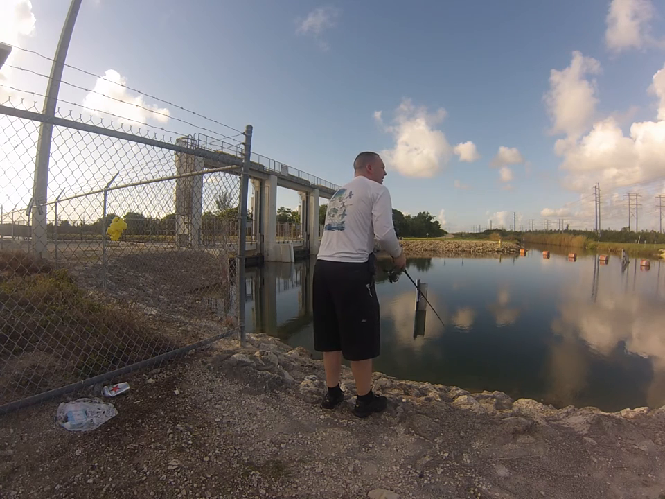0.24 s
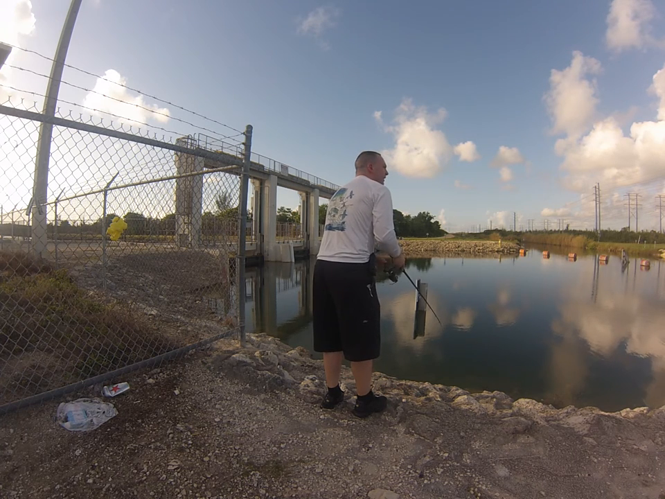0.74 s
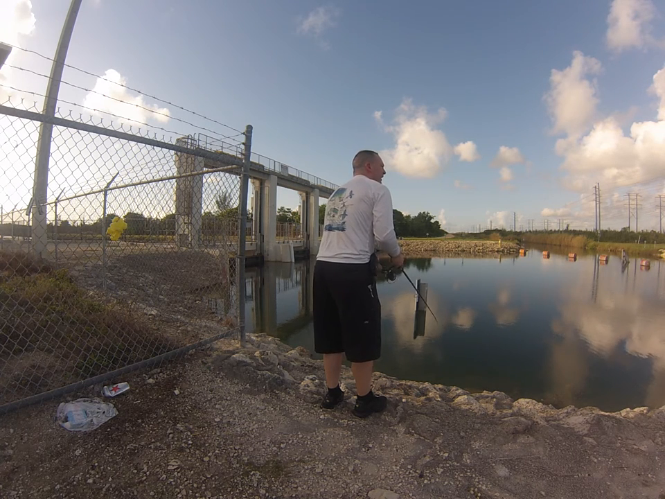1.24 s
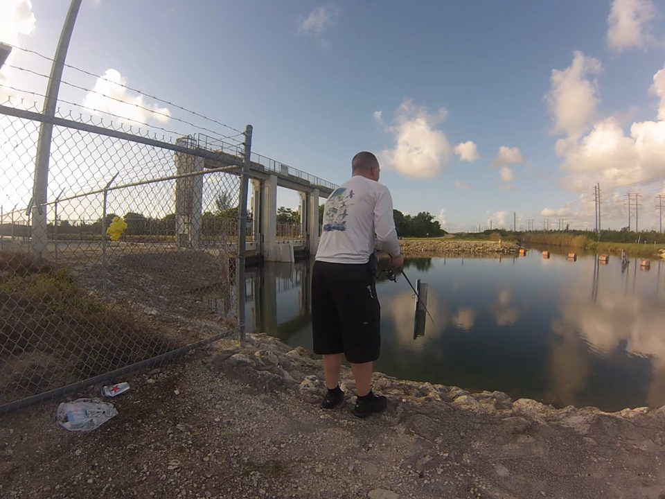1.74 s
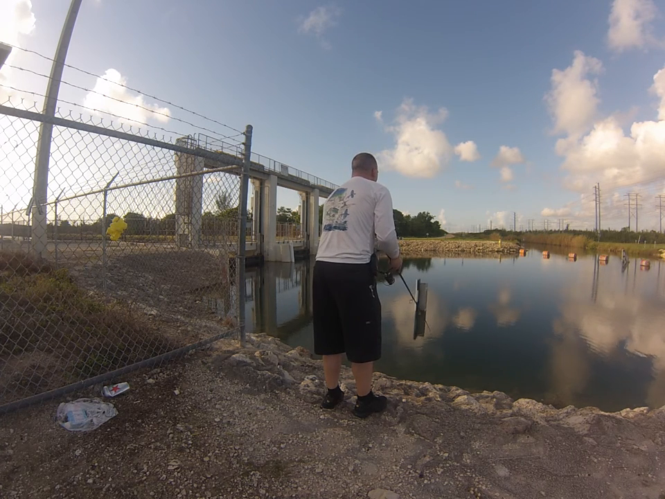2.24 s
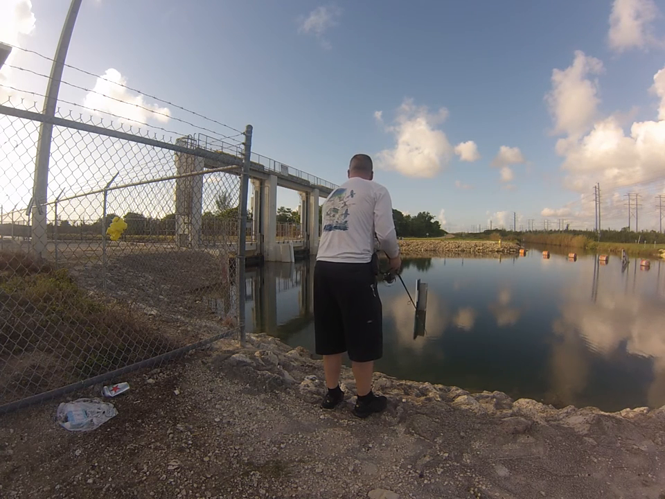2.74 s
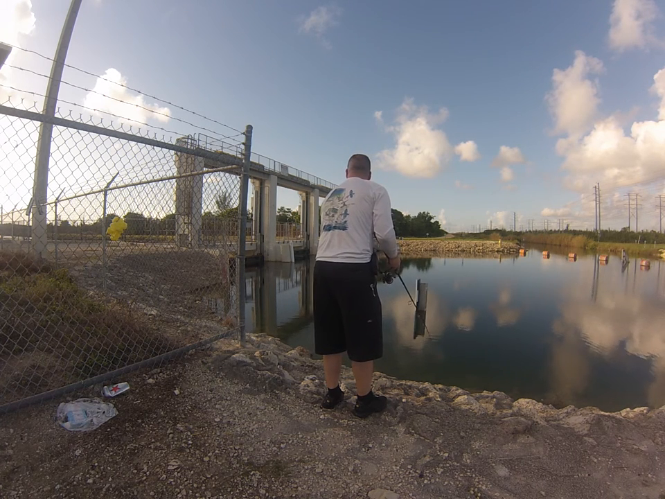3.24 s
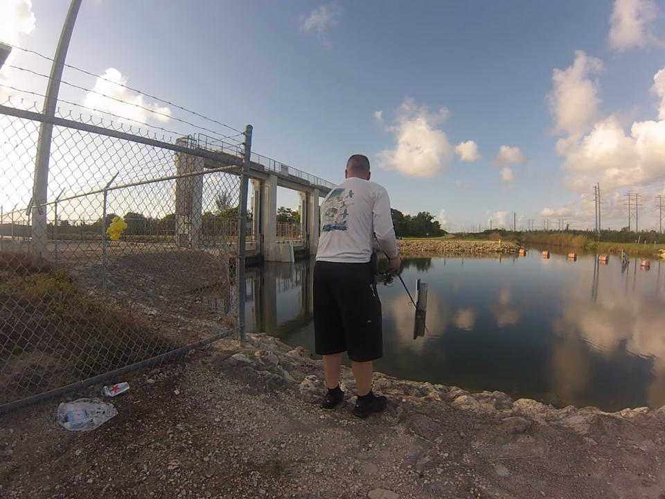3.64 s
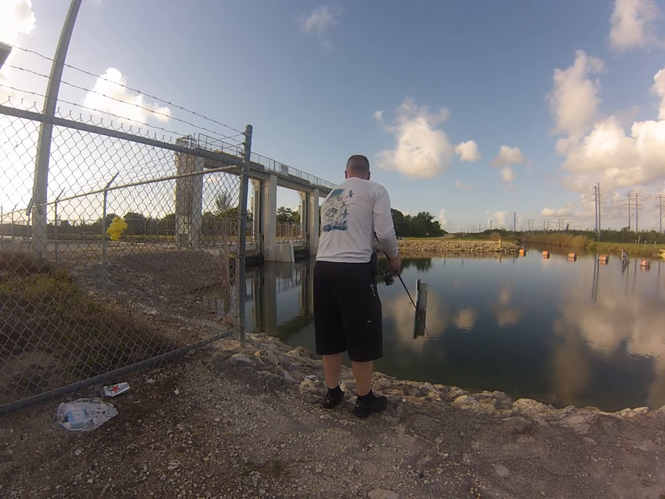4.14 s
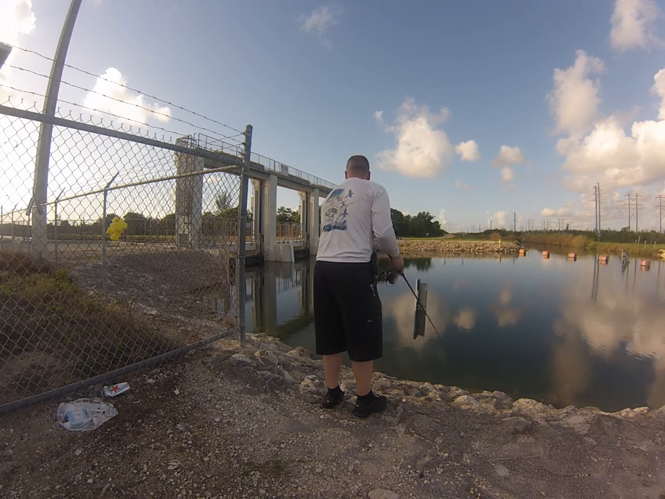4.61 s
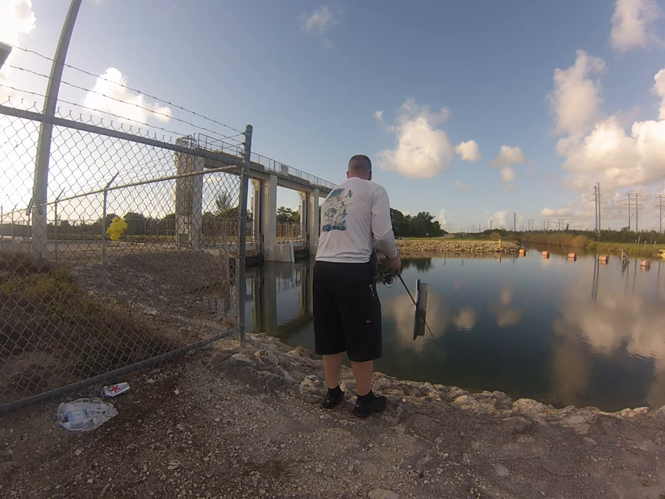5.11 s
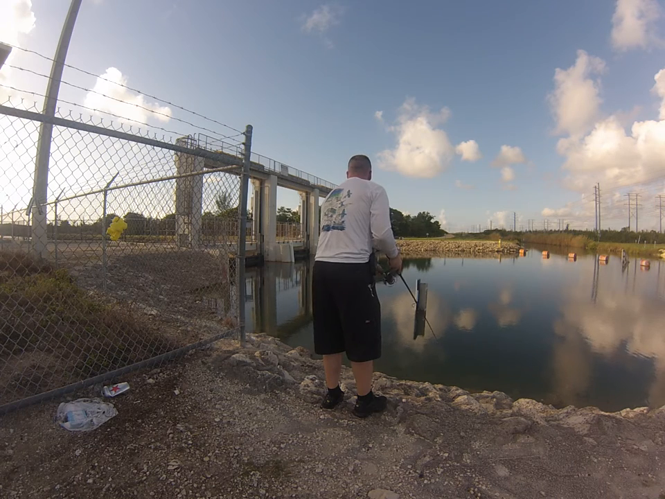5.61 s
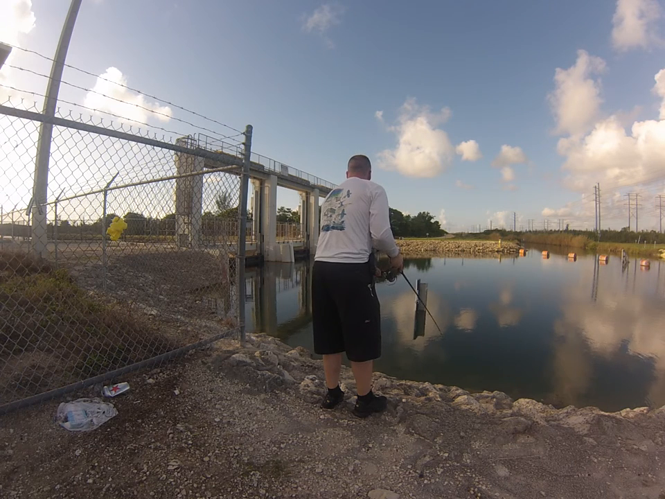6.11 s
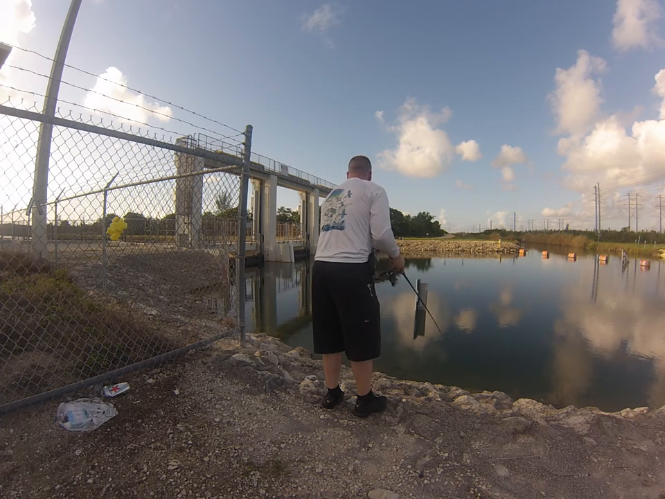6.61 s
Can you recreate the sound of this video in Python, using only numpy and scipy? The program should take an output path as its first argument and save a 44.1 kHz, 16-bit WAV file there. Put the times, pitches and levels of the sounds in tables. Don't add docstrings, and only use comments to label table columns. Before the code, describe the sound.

Outdoors by a canal, an electric pump motor hums steadily with many fixed tones, beating slowly against mains hum. Low drones of farther machines and a breeze rumble lie underneath. Wind bumps the microphone in the first seconds, strongest as a soft thump just after one second. A few tiny reel ticks, far insects, hiss and dry crackles sit faintly on top.

```python
import sys
import numpy as np
from scipy import signal
from scipy.fft import rfft, irfft
from scipy.io import wavfile
from scipy.ndimage import uniform_filter1d, map_coordinates

SR = 44100
rng = np.random.default_rng(int(sys.argv[2]) if len(sys.argv) > 2 else 0)


def how_loud(loudness_db):
    steps = np.asarray(loudness_db, float) / 20
    return 10 ** steps


def output_pcm(signal):
    pcm = np.clip(np.atleast_2d(signal).T, -1, 1) * 32767
    wavfile.write(sys.argv[1], SR, np.round(pcm).astype(np.int16))


N = 302526
TIME = np.arange(N) / SR

SHAFT_HZ, MAINS_HZ, STROKES = 29.7613, 59.994, 12
SLIP_HZ = 2 * MAINS_HZ - 4 * SHAFT_HZ


def unit(x):
    return x / np.sqrt(np.mean(x ** 2) + 1e-20)


def wobble(rate_hz):
    knots = rng.standard_normal(int(N * rate_hz / SR) + 4)
    return map_coordinates(knots, [TIME * rate_hz])


def noise(spectrum, patchy_db):
    z = signal.stft(rng.standard_normal(N + 512), nperseg=512)[2]
    field = uniform_filter1d(rng.standard_normal(z.shape), size=6, axis=0)
    field = uniform_filter1d(field, size=8, axis=1)
    patchy = signal.istft(z * how_loud(patchy_db * unit(field)), nperseg=512)[1][:N]
    f, db = np.transpose(spectrum)
    hz = np.fft.rfftfreq(N, 1 / SR)
    colour_db = np.interp(np.log(hz + 1), np.log(f), db, left=-120, right=-120)
    return unit(irfft(rfft(patchy) * how_loud(colour_db), N))


# multiple of shaft speed, level in dB rms.
STROKE_TONES = [(12, -57.6), (24, -75.3), (36, -67.7), (48, -61.7), (60, -58.1), (72, -62.3), (84, -69.0),
                (96, -96.6), (108, -88.5)]
# multiple of shaft speed, level in dB rms.
THIRDS = [(3, -58.1), (9, -71.4), (15, -66.6), (18, -74.9), (27, -68.1), (30, -78.2), (33, -78.2),
          (57, -78.7), (63, -74.7), (69, -79.7), (87, -80.8)]
# multiple of shaft speed, level in dB rms.
UNBALANCE = [(5, -72.5), (10, -74.6), (11, -78.2), (14, -76.7), (16, -67.1), (17, -75.8), (47, -80.8),
             (49, -74.1), (53, -80.0), (59, -76.1), (67, -79.7), (70, -77.8), (71, -73.5), (73, -76.8)]
# multiples away from it, level under it in dB.
ROCKING = [(-2, -24), (-1, -17), (1, -23), (2, -22), (-4, -27), (4, -28)]
HIGH_STROKES_DB, HIGH_LOSS_DB, HIGH_SCATTER_DB = -93.5, .6, 2
OTHER_THIRDS_DB, THIRDS_SCATTER_DB = -83.5, 2


def shaft_tones():
    scatter = rng.standard_normal(300).clip(-2, 2)
    tones = {}
    for k, db in STROKE_TONES:
        for away, under_db in ROCKING:
            tones[k + away] = db + under_db + 2 * scatter[k + away]
    for k in range(21, 90, 3):
        tones[k] = OTHER_THIRDS_DB + THIRDS_SCATTER_DB * scatter[k]
    for stroke in range(10, 22):
        level_db = HIGH_STROKES_DB - HIGH_LOSS_DB * (stroke - 10)
        tones[stroke * STROKES] = level_db + HIGH_SCATTER_DB * scatter[stroke]
    tones.update([*STROKE_TONES, *THIRDS, *UNBALANCE])
    return [(k, db) for k, db in sorted(tones.items()) if db > -102 + 11 * (k % STROKES > 0)]


# multiple of shaft speed, slip steps away from it, level in dB rms.
MAGNETIC = [(12, 3, -61.6), (8, 2, -70.4), (3, -3, -72.7), (16, 1, -75.0), (16, -1, -79.9), (17, 4, -78.0),
            (8, -1, -78.2), (18, 3, -78.2), (14, -1, -79.7), (27, -1, -82.2), (16, 3, -82.9)]
# multiple, slip steps away from it, level in dB rms.
AGAINST = [(17, -1, -77.1), (11, -1, -77.4), (16, 4, -77.9), (9, 2, -78.4), (10, -2, -79.4), (9, -3, -81.6),
           (17, 1, -82.6), (24, 6, -82.7), (24, 3, -83.0), (27, 2, -83.8)]
IN_STEP_S = .061
CASING_LOW_HZ, CASING_HIGH_HZ, LAG_CYCLES = 900, 2000, .3
ROCK_CYCLES = .17


def motor():
    clock = TIME + 1.2e-5 * wobble(1.1) + 4e-6 * wobble(9.9)
    start = rng.uniform(0, 2 * np.pi, size=300)
    stroke_hz = np.arange(0, 300, STROKES) * SHAFT_HZ
    in_casing = (stroke_hz > CASING_LOW_HZ) & (stroke_hz < CASING_HIGH_HZ)
    start[::STROKES] = np.where(in_casing, 0, -2 * np.pi * LAG_CYCLES)
    k = np.arange(STROKES, 280, STROKES)
    for away in (-3, -1, 1, 3):
        start[k + away] = start[k] + 2 * np.pi * ROCK_CYCLES + away * start[k + 5]
    drift = how_loud(.4 * np.array([wobble(4) for _ in range(7)]))
    out = np.zeros(N)
    for k, db in shaft_tones():
        out += how_loud(db) * drift[k % 7] * np.sin(2 * np.pi * k * SHAFT_HZ * clock + start[k])
    for side, table in ((0.99, MAGNETIC), (-0.97, AGAINST)):
        for k, step, db in table:
            turns = k * SHAFT_HZ * clock + step * SLIP_HZ * (TIME - IN_STEP_S)
            out += side * how_loud(db) * np.sin(2 * np.pi * turns + start[k])
    return np.sqrt(2) * out


# frequency in Hz, level in dB.
FAINT = [(320, -84.5), (500, -100), (900, -91), (1400, -99.5), (2200, -94.5), (3000, -104), (4800, -106)]


def side_tones():
    k, step = np.meshgrid(np.arange(11, 160), np.arange(-3, 9))
    hz = (k * SHAFT_HZ + step * SLIP_HZ).ravel()
    f, level_db = np.transpose(FAINT)
    db = np.interp(np.log(hz), np.log(f), level_db)
    db -= 3.1 * np.abs(step.ravel() - 1) ** .6
    db += 4.5 * rng.standard_normal(len(hz)).clip(-3, 1.8)
    lines = np.zeros(N // 2 + 1, complex)
    lines[np.round(hz * N / SR).astype(int)] = how_loud(db) * np.exp(2j * np.pi * rng.random(len(hz)))
    return irfft(lines, N) * N / np.sqrt(2)


# frequency in Hz, width in Hz, level in dB rms.
DRONES = [(29.7, 1.93, -59.5), (34.75, 0.34, -63.5), (43.45, 0.56, -65.5), (59.1, 2.8, -61),
          (124.3, 1, -67.5)]


def drones():
    f = np.fft.rfftfreq(N, 1 / SR)
    out = np.zeros(N)
    for hz, width, db in DRONES:
        resonance = np.exp(-((f - hz) / width) ** 2)
        out += how_loud(db) * unit(irfft(rfft(rng.standard_normal(N)) * resonance, N))
    return out


def bump(s, db, hz, cycles, swing):
    out, near = np.zeros(N), np.abs(TIME - s) < .12
    turn = (TIME[near] - s) * hz
    out[near] = how_loud(db) * swing(2 * np.pi * turn) / np.cosh(2 * np.clip(turn / cycles, -50, 50))
    return out


# time in seconds, strength in dB.
BREEZE = [(0.0, -48.5), (0.57, -53), (1.01, -46), (1.18, -44.5), (1.41, -48.5), (2.04, -48.5),
          (2.69, -53.5), (2.92, -52.5), (3.04, -50.5), (3.92, -53), (4.24, -53), (4.81, -55), (6.02, -50.5),
          (6.19, -53.5), (6.5, -51), (6.86, -58)]
# frequency in Hz, level in dB per Hz.
DEEP = [(8, -24.5), (16, 1), (30, 2), (50, -5), (75, -29), (120, -65)]
# frequency in Hz, level in dB per Hz.
UPPER = [(35, -34), (55, 2), (90, -9), (150, -12.5), (200, -24), (300, -56), (500, -101)]
# centre in seconds, peak in dB, frequency in Hz.
DIPS = [(0.098, -33.5, 45.3), (.282, -31, 48), (1.007, -37, 45), (1.03, -38, 60), (1.066, -49, 50),
        (1.151, -29.5, 50), (1.298, -28, 78), (1.321, -38, 70), (1.456, -28.5, 65), (1.583, -33.5, 40),
        (1.638, -33.5, 50), (1.68, -38, 45), (1.705, -39, 70), (2.026, -42, 60), (2.041, -38, 60),
        (2.117, -41, 50), (2.151, -36, 55), (2.187, -34, 65), (2.224, -39, 35), (2.252, -37, 50),
        (2.367, -42, 50), (2.507, -34, 35), (2.622, -40, 45.4), (5.022, -40, 50), (5.186, -42, 50)]
# centre in seconds, peak in dB, frequency in Hz.
PUSHES = [
    (.008, -38.5, 55),
    (.041, -41, 50),
    (1.128, -38, 70),
    (1.157, -36, 110),
    (1.275, -36, 70),
    (2.237, -39, 45),
    (5.73, -41, 40),
]
DEEP_DB, UPPER_DB = 0.5, -4.5
UPPER_GROWS, CALM_DB = 0.74, -53
BUMP_CYCLES = 0.54
THUMP_S, THUMP_DB, THUMP_HZ, THUMP_CYCLES = 1.1653, -20.5, 125, 0.64


def breeze():
    strength_db = np.interp(TIME, *np.transpose(BREEZE))
    upper_db = CALM_DB + UPPER_GROWS * (strength_db - CALM_DB) + UPPER_DB
    lump = wobble(20)
    deep = unit(how_loud(1.9 * lump + 1.5 * wobble(3.4)) * noise(DEEP, patchy_db=1.3))
    upper = unit(how_loud(0.53 * lump + 1.2 * wobble(25)) * noise(UPPER, patchy_db=0.4))
    out = how_loud(strength_db + DEEP_DB) * deep + how_loud(upper_db) * upper
    for row in PUSHES:
        out += bump(*row, BUMP_CYCLES, np.cos)
    for row in DIPS:
        out -= bump(*row, BUMP_CYCLES, np.cos)
    return out - bump(THUMP_S, THUMP_DB, THUMP_HZ, THUMP_CYCLES, np.sin)


# frequency in Hz, level in dB per Hz.
PLANT = [(80, -36), (200, -2.5), (300, -5), (400, 0.5), (520, -2.5), (580, -10), (820, -7), (1060, -14),
         (1300, -10), (2000, -20), (2700, -17.5), (4500, -22), (8000, -24.5), (16000, -31.5)]


def plant():
    return how_loud(-60 + 0.2 * wobble(2.48)) * noise(PLANT, patchy_db=0.85)


# frequency in Hz, level in dB per Hz.
INSECTS = [(7300, -40), (8000, -9), (8500, -1), (8900, 0.5), (9150, -8), (9500, -38)]


def insects():
    return how_loud(-77.5 + 0.65 * wobble(5.5)) * noise(INSECTS, patchy_db=0.0)


# frequency in Hz, level in dB per Hz.
HISS = [(100, -21), (700, -1.5), (1500, -17), (3000, 0.5), (5000, 3.5), (8000, 2.5), (12000, -2),
        (16000, -3)]


def hiss():
    return how_loud(-74.5) * np.array([noise(HISS, patchy_db=1.5), noise(HISS, patchy_db=1.0)])


def patchy_top(x):
    hz, _, z = signal.stft(x, SR, nperseg=2048)
    field = uniform_filter1d(rng.standard_normal(z.shape[1:]), size=7, axis=0)
    patches = np.where(unit(field) > -.15, 1.35, .02)
    gain = np.where(hz[:, None] > 12800, patches, 1)
    return signal.istft(z * gain, SR, nperseg=2048)[1][:, :N]


# time in seconds, peak in dB.
SPARKS = [(0.4818, -60), (0.609, -64), (1.0515, -62), (1.0954, -63), (1.3099, -65), (1.9235, -63),
          (2.154, -61), (2.3092, -66), (2.376, -56), (2.5426, -66), (2.6853, -56), (2.8709, -56),
          (2.9352, -64), (2.9602, -65), (3.1577, -61), (3.5049, -63), (3.8871, -57), (5.3083, -63),
          (5.5044, -64), (5.5393, -61)]


def crackles():
    out = np.zeros(N)
    s, db = np.transpose(SPARKS)
    out[np.round(s * SR).astype(int) + 45] = how_loud(db + 15.5)
    return signal.sosfilt(signal.butter(3, 10500, "high", fs=SR, output="sos"), out)


# start in seconds, peak in dB, frequency in Hz, ratio between
# neighbouring modes, fall by 60 dB in seconds.
TICKS = [
    (.6092, -50, 3900, 1.13, .01),
    (.612, -63, 3300, 1.02, .02),
    (1.6801, -64, 7040, 1.02, .025),
    (3.2969, -62, 3200, 1.05, .012),
    (5.7947, -68, 3380, 1.005, .03),
    (6.5338, -50.5, 3750, 1.075, .009),
    (6.5338, -54, 7100, 1.025, .014),
]


def reel_ticks():
    out, t = np.zeros(N + 2000), np.arange(2000) / SR
    for s, db, hz, spread, t60 in TICKS:
        ring = sum(np.sin(2 * np.pi * hz * spread ** j * t) / (1 + 0.23 * j) for j in range(4))
        attack = 1 - np.exp(-t / 0.00059)
        out[round(s * SR):][:len(t)] += how_loud(db - 60 * t / t60) * ring * attack
    return out[:N]


def scene():
    machinery = motor() + side_tones() + drones() + plant()
    surroundings = breeze() + insects() + reel_ticks()
    return np.tile(machinery + surroundings, (2, 1))


def low_pass(x):
    return signal.sosfilt(signal.butter(12, 15250, fs=SR, output="sos"), x)


def record(dry):
    mix = patchy_top(dry + hiss()) + crackles()
    return low_pass(mix)


dry = scene()
out = record(dry)
output_pcm(out)
```